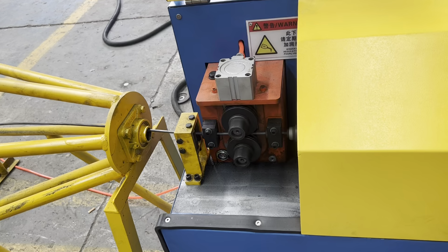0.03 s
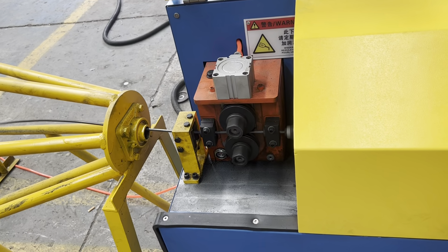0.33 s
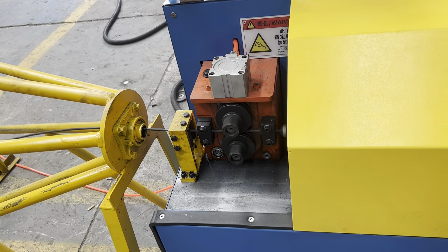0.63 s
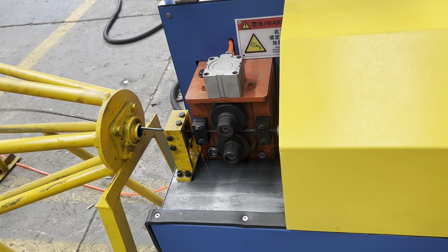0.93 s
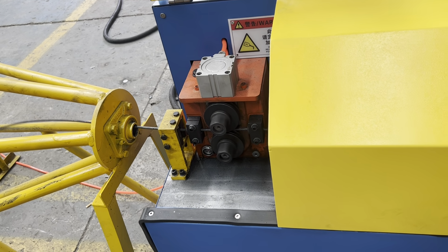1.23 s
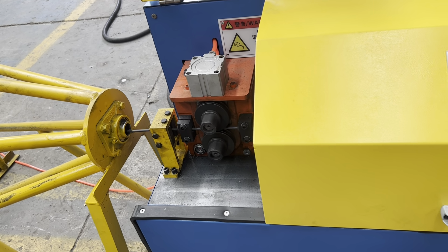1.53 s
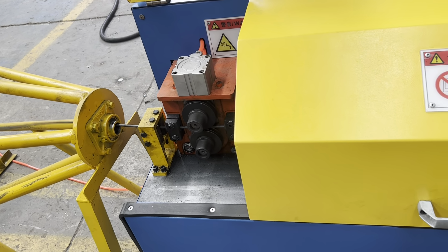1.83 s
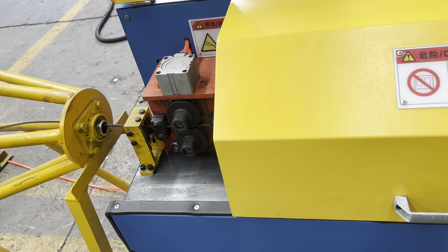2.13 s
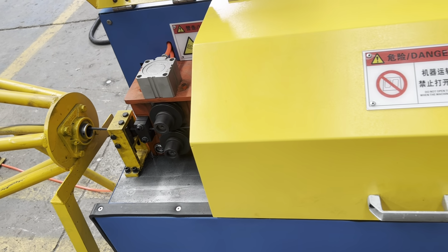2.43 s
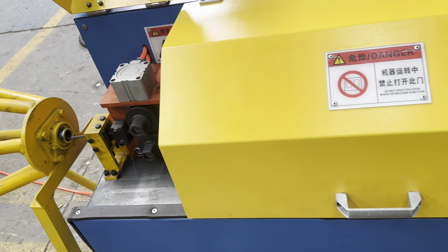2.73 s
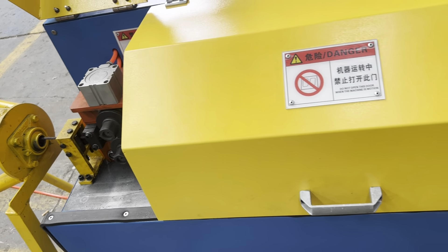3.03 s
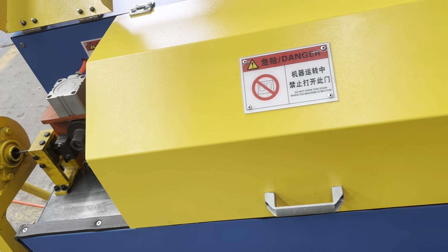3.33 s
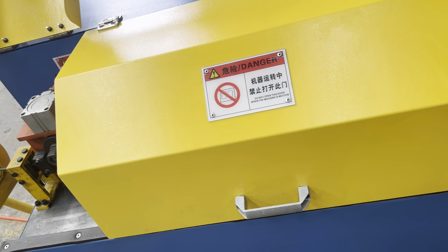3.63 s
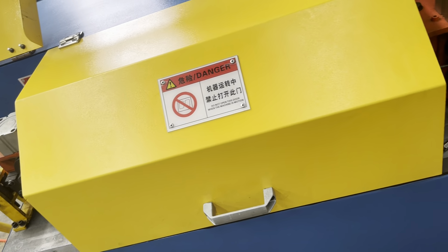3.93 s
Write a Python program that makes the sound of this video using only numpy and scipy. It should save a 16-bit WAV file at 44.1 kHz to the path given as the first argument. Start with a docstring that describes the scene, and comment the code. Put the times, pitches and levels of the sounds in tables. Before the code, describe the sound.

A wire straightening machine drones and rattles close by in an open yard. The wire scrapes and gives thin, high squeaks, with a few ticks and dull knocks, then clanks against its guides near the end.

```python
"""A wire straightening machine runs in an open yard, close to a handheld camera with two microphones.
From the start its rotor hums at about 90 turns a second over the motor, the steel hood rattles, and
the wire scrapes, hisses and squeaks once a turn in the dies (the holes it is pulled through).
Two sharp ticks come in the first second, then two dull knocks and a few thin pings; the feed rollers
rasp now and then. From 3.4 s the wire clanks against its guides."""
import sys
import numpy as np
from scipy import signal
from scipy.fft import rfft, irfft, next_fast_len
from scipy.io import wavfile
from scipy.ndimage import uniform_filter1d, map_coordinates

SR = 44100
rng = np.random.default_rng(int(sys.argv[2]) if len(sys.argv) > 2 else 0)


def to_wav(s):
    """Save 16-bit WAV."""
    ch = np.atleast_2d(s).T  # columns
    pcm = np.round(np.clip(ch, -1, 1) * 32767)  # PCM
    wavfile.write(sys.argv[1], SR, pcm.astype(np.int16))


N = 176400
TIME = np.arange(N) / SR


def hum(angle):
    """The off-balance rotor, the drive and the motor shake as they spin, making wavering tones."""
    # four tones (time [s], rotor [dB], twice rotor [dB], drive [dB], four times motor [dB])
    levels = [(0.08, -25.5, -30, -23, -28), (0.12, -23, -25.5, -22, -40), (0.21, -24.5, -25.5, -23, -24),
              (0.73, -23.5, -24, -21, -43), (0.86, -23, -25.5, -23.5, -29), (1.26, -25.5, -26, -22, -35),
              (1.32, -26, -39, -42, -43), (1.35, -21, -31, -28, -20.5), (1.48, -24, -44, -25, -22.5),
              (1.55, -25, -32, -21.5, -32), (1.79, -25.5, -26, -25.5, -23), (1.85, -28.5, -28, -31.5, -27),
              (2.16, -25.5, -25, -22, -39), (2.23, -25.5, -28.5, -23.5, -24), (2.52, -28, -26.5, -24, -39),
              (2.8, -27, -30.5, -23.5, -28), (2.88, -28, -23, -28.5, -32), (3.1, -26, -38, -30.5, -25.5),
              (3.23, -26, -28, -20.5, -29.5), (3.47, -27, -28, -20, -26), (3.82, -28.5, -27.5, -24.5, -31),
              (3.95, -30, -28.5, -21.5, -30.5)]
    # one value for each tone
    trims = [-0.6, 0.35, -0.027, -1.4]  # (added level [dB])
    wavers = [1.2, 1.4, 1.7, 2.5]  # (level wobble [dB])
    jitters = [.08, .15, .25, .7]  # (phase wobble [radians])
    pans = [0.5, -2, -3, -3]  # (left minus right [dB])
    motor_tones = [(1, -48.5), (2, -37.5)]  # low drone (multiple of motor speed, level [dB])
    drive, motor = 2.9, .557  # turns per rotor turn
    out = sum(amp(db) * np.sqrt(2) * np.sin(k * motor * angle + 0.19 * wobble(4.8))
              for k, db in motor_tones)
    flutter_db = 0.4 * wobble(31.83)
    multiples = [1, 2, drive, 4 * motor]
    for k, db, trim, waver, jitter, pan in zip(multiples, curves(levels), trims, wavers, jitters, pans):
        tone = np.sqrt(2) * np.sin(k * angle + jitter * wobble(16) + 2 * np.pi * rng.random())
        gain = amp(db + trim + flutter_db + waver * wobble(18))
        out = out + tone * gain * amp([[pan / 2], [-pan / 2]])
    return out


def hood():
    """The sheet-steel hood rattles in an even churn."""
    levels = [(.05, -20.5, -21.5), (.6, -21.5, -20.5), (1.0, -20.5, -20.5), (1.25, -20.5, -21),
              (1.65, -21.5, -22.5), (2.1, -25.5, -24.5), (2.5, -24.5, -23.5), (2.9, -23.5, -21.5),
              (3.35, -23, -22), (3.72, -23.5, -23.5), (4, -24.5, -21)]  # rattle (time [s], low part [dB], high part [dB])
    spectrum = [(200, -26), (330, -3), (400, -6.5), (450, -4), (500, -1.5), (590, 1), (670, -5.5),
                (745, -3.5), (810, -2), (900, -7), (980, -10), (1060, -7.5), (1300, -7), (1520, -7.5),
                (1650, -10), (1820, -10.5), (1960, -12), (2100, -15.5), (2300, -18.5), (2900, -19.5),
                (3600, -22.5), (4300, -23), (5400, -29), (9000, -35)]  # its tone colour (frequency [Hz], level [dB])
    low_db, high_db = curves(levels)
    shaking = unit(amp(0.51 * wobble(260) + 0.64 * wobble(45)))
    rattle = shaking * even(patchy(rush(spectrum), depth_db=1.03))
    low = filtered(rattle, lambda hz: 1 / (1 + (hz / 1400) ** 6))  # below 1400 Hz
    return amp(1) * (amp(low_db) * low + amp(high_db) * (rattle - low))


def ringing():
    """Shaken steel parts keep ringing, and come and go as the camera moves along the hood."""
    parts = [(349.5, 12, -39, 2.5), (500.6, 12, -37.5, 0), (738, 19, -35.5, -1.5), (1050, 40, -40.5, -2),
             (1310, 30, -40, -0.5), (1553, 12, -39.5, 1.3), (1950, 68, -40.5, -3.5),
             (2443, 16, -47.5, -0.5), (8030, 44, -48.5, -0.5)]  # (pitch [Hz], width [Hz], level halfway [dB], drift [dB per s])
    out = 0
    for pitch, width, db, drift in parts:
        gain = amp(db + drift * (TIME - N / SR / 2) + 2.2 * wobble(6.77))
        out = out + gain * even(noise(lambda hz: 1 / (1 + ((hz - pitch) / (width / 2)) ** 2)))
    return out


def wire(angle):
    """The wire rubs in the spinning dies: it scrapes, hisses and squeaks once a turn."""
    levels = [(0.06, -39.5, -42), (0.17, -38.5, -55), (0.29, -40, -39), (0.32, -40, -45),
              (0.37, -33.5, -34), (0.51, -34, -47), (0.56, -29, -40), (0.58, -35.5, -43), (0.8, -40, -46.5),
              (0.91, -35, -47), (1.15, -39, -47), (1.27, -30.5, -33.5), (1.51, -37.5, -52),
              (1.56, -34, -40), (1.94, -40, -48.5), (2.8, -38.5, -45), (2.89, -33, -38),
              (2.91, -36.5, -38.5), (3.05, -32.5, -38), (3.17, -39, -46), (3.33, -36.5, -39),
              (3.39, -39, -44.5), (3.55, -33.5, -43), (3.62, -37, -42), (3.75, -37.5, -44.5),
              (4, -35.5, -43)]  # rubbing (time [s], scrape [dB], hiss [dB])
    # tone colours (frequency [Hz], level [dB])
    scrape_spectrum = [(1500, -20), (2500, -2.5), (3600, -2), (3900, -3.5), (4300, -3), (5400, -2.5),
                       (6300, -0.5), (7500, -1), (8000, 0), (8400, -2.5), (9100, 1.5), (10000, -12.5),
                       (12000, -3), (16000, -15)]
    hiss_spectrum = [(5000, -30), (9000, -6), (10400, -7.5), (11700, -1), (12900, -7), (13550, 3),
                     (14500, -1.5), (15700, 1.5), (17000, -19)]
    scrape_db, hiss_db = curves(levels)
    turn = angle + 0.32 * wobble(13)
    grip = wobble(27.95)
    scrape_flicker = unit(amp(0.23 * np.cos(turn) + 1.26 * grip + 1.1 * wobble(700)))
    scrape = scrape_flicker * patchy(rush(scrape_spectrum), depth_db=2.5)
    hiss_flicker = unit(amp(0.63 * np.cos(turn) + 0.56 * grip + 1.4 * wobble(600)))
    hiss = hiss_flicker * patchy(rush(hiss_spectrum), depth_db=3.5)
    return amp(scrape_db + 4.5) * scrape + amp(hiss_db + 9) * hiss + squeaks(turn)


def squeaks(turn):
    """The wire gives one high squeak a turn, louder in short spells."""
    spells = [(0.235, 0.12, -21), (0.4, 0.056, -24), (0.597, 0.031, -22), (0.75, .06, -27),
              (0.926, 0.064, -29), (1.187, .04, -24), (1.282, 0.08, -29), (1.452, .06, -29),
              (1.725, 0.063, -28), (2.062, 0.16, -33), (2.98, .12, -32)]  # (middle [s], length [s], level [dB])
    spectrum = [(9000, -20), (11500, -18), (12400, -12), (13000, -20), (13550, 0), (14300, -14),
                (15700, -13), (17000, -22)]  # tone colour (frequency [Hz], level [dB])
    idle_db, sharpness, scatter_db = -36.5, 3.7, 4
    swell = sum(amp(db) * np.exp(-(2 * (TIME - s) / length) ** 4) for s, length, db in spells)
    pulses = np.exp(sharpness * (np.cos(turn) - 1)) * amp(scatter_db * wobble(90))
    return (amp(idle_db) + swell) * pulses * rush(spectrum)


def clanks():
    """The wire slaps its guide: a crash and short steel notes, whose mix depends on where it hits."""
    # slaps (time [s], level [dB], brightness [dB per octave], place [0 near end to 1 far end])
    slaps = [(3.4222, -13, -.5, 0.097), (3.436, -18, -0.5, 0.12), (3.458, -22.5, 2, 0.31),
             (3.8715, -18, -0.5, 0.37), (3.9, -13, 0.5, 1)]
    # the guide's notes (pitch [Hz], near-end hit [dB], far-end hit [dB], fade time [s])
    notes = [(529, -2.5, -2.5, 0.19), (914, -10, -7, 0.19), (996, -6.5, -2, 0.15), (1450, -16, -6, 0.15),
             (1798, -0.5, -24, 0.094), (1930, -3, 4, 0.11), (2108, -14, -5.5, 0.16),
             (2466, -4.5, -10, 0.14), (2690, -16, -9, 0.038), (2910, -13, -9, 0.14),
             (3340, -10, -11, 0.098), (3656, -7.5, -14, 0.11), (4190, -15, -6, 0.083),
             (5610, -25, -16, .12)]
    spectrum = [(30, -70), (200, -8), (480, 3), (1000, -3), (1900, -3), (2600, -3), (4200, -6.5),
                (6000, -11), (9000, -22), (16000, -35)]  # the crash's tone colour (frequency [Hz], level [dB])
    out = 0
    for s, db, brightness, place in slaps:
        tilt_db = lambda hz: brightness * np.log2((hz + 1) / 2000)
        crash = noise(lambda hz: amp(along(spectrum, hz) + tilt_db(hz)))
        out = out + amp(db - 3.5) * decay(s, fade=0.17, attack=0.00073) * crash
        for hz, near_db, far_db, fade in notes:
            note_db = np.interp(place, [0, 1], [near_db, far_db]) + tilt_db(hz) + rng.normal(0, 1)
            phase = 2 * np.pi * rng.random() + .5 * rng.standard_normal((2, 1))
            note = np.sin(2 * np.pi * hz * TIME + phase)
            out = out + amp(db + note_db - 1.04) * decay(s, fade, attack=0.00091) * note
    return out


def pings():
    """The wire catches briefly and rings with a thin, high note."""
    catches = [(1.6594, 8000, -22), (2.8674, 8000, -17), (3.4226, 7200, -22.5), (3.469, 7900, -20),
               (3.5744, 7160, -33), (3.905, 7170, -29)]  # (time [s], pitch [Hz], level [dB])
    note = lambda hz: np.sin(2 * np.pi * hz * TIME + 0.66 * wobble(220))
    return sum(amp(db) * decay(s, fade=0.09, attack=0.0034) * note(hz) for s, hz, db in catches)


def ticks():
    """The wire catches in the dies with a dry tick."""
    catches = [(.5985, -24), (0.699, -17)]  # (time [s], level [dB])
    spectrum = [(2000, -25), (6000, -5), (12000, -8), (13700, -2), (16000, -3)]  # tone colour (frequency [Hz], level [dB])
    return rush(spectrum) * sum(amp(db) * decay(s, fade=0.041, attack=0.00046) for s, db in catches)


def knocks():
    """The hood gives a soft, dull knock now and then."""
    blows = [(1.165, -16.5), (2.285, -25)]  # (time [s], level [dB])
    spectrum = [(200, -40), (500, 3), (800, -2), (4000, -53)]  # tone colour (frequency [Hz], level [dB])
    return rush(spectrum) * sum(amp(db) * decay(s, fade=0.31, attack=.004) for s, db in blows)


def rasps():
    """The feed rollers slip on the wire: brief bands of noise."""
    slips = [(0.413, 0.1, 4100, -34), (1.564, 0.045, 4300, -33), (1.77, .015, 4300, -31),
             (2.67, 0.085, 4500, -33.5), (3.178, 0.21, 2920, -35.5)]  # (middle [s], length [s], pitch [Hz], level [dB])
    octaves = 0.44  # half the width of a band
    band = lambda pitch: noise(lambda hz: np.exp(-.5 * (np.log2((hz + 1) / pitch) / octaves) ** 2))
    return sum(amp(db) * np.exp(-(2 * (TIME - s) / length) ** 2) * band(hz)
               for s, length, hz, db in slips)


def frame():
    """The machine's frame rumbles underneath."""
    levels = [(.05, -27), (.9, -24), (1.4, -23), (2.1, -28.5), (2.8, -26), (3.4, -26), (4, -26.5)]  # rumble (time [s], level [dB])
    spectrum = [(25, -40), (40, -20), (55, -0.5), (75, 1.5), (100, -10.5), (120, -3), (150, -1),
                (175, -0.5), (222, 7.5), (245, 2.5), (272, 5), (290, -1), (320, -1), (352, 2.5),
                (400, -3.5), (480, -6.5), (700, -56)]  # its tone colour (frequency [Hz], level [dB])
    return amp(curves(levels)[0]) * rush(spectrum)


def amp(db):
    """Decibels to gain."""
    return 10 ** (np.asarray(db) / 20)


def unit(x):
    """Scale to an average power of 1."""
    return x / np.sqrt(np.mean(x ** 2) + 1e-20)


def along(points, hz):
    """Read between (frequency, value) points on a log axis."""
    f, v = np.transpose(points)
    return np.interp(np.log(hz + 1), np.log(f + 1), v)


def curves(rows):
    """One value per sample for each column after the time."""
    s, *cols = np.transpose(rows)
    return [np.interp(TIME, s, c) for c in cols]


def wobble(rate):
    """A smooth curve through `rate` random values a second."""
    return map_coordinates(rng.standard_normal(int(N * rate / SR) + 4), [TIME * rate])


def filtered(x, response):
    """Multiply each frequency in x by response(hz)."""
    m = next_fast_len(N + 8192)
    return irfft(rfft(x, m) * response(np.fft.rfftfreq(m, 1 / SR)), m)[..., :N]


def noise(gain):
    """Noise shaped by gain(hz), partly alike on the left and right."""
    likeness = [(60, 1), (250, 0.89), (450, 0.57), (1000, 0.26), (1900, 0.49), (2300, 0.17), (3200, 0.71),
                (4500, 0.7), (5800, 0.33), (7000, 0.65), (9000, 0.94), (9800, 1), (10700, 1), (11300, 0.56),
                (12500, 1), (13500, 1), (14600, 0.99)]  # (frequency [Hz], left-right likeness [0 to 1])
    spread = lambda hz: np.arccos(np.clip(along(likeness, hz), 0, 1)) / 2
    shares = lambda hz: np.array([np.cos(spread(hz)), np.sin(spread(hz))])
    mid, side = filtered(rng.standard_normal((2, N)), lambda hz: gain(hz) * shares(hz))
    return unit(np.array([mid + side, mid - side]))


def rush(spectrum):
    """Stereo noise with the given tone colour."""
    return noise(lambda hz: amp(along(spectrum, hz)))


def decay(s, fade, attack):
    """A blow at time s rises, and dies away by 60 dB in `fade` seconds."""
    age = np.maximum(TIME - s, 0)
    return np.exp(-np.log(1000) * age / fade) * (1 - np.exp(-age / attack))


def patchy(x, depth_db):
    """Let neighbouring pitch bands swell and fade on their own."""
    bands = signal.stft(x, nperseg=512)[2]
    swell = uniform_filter1d(rng.standard_normal(bands.shape[1:]), size=6, axis=0)
    swell = uniform_filter1d(swell, size=10, axis=1)
    return unit(signal.istft(bands * amp(depth_db * unit(swell)), nperseg=512)[1][:, :N])


def even(x):
    """Hold the power steady from one tenth of a second to the next."""
    power = uniform_filter1d(np.mean(x ** 2, axis=0), size=SR // 10)
    return x / np.sqrt(np.abs(power) + 1e-12)


def scene():
    """The whole machine, spread between left and right."""
    speed = [(0.2, 89.67), (0.42, 89.21), (0.65, 89.84), (1.0, 90.09), (1.25, 90.61), (1.45, 90.98),
             (1.7, 90.23), (1.95, 89.63), (2.3, 89.83), (2.7, 90.22), (3.12, 90.63), (3.4, 89.95),
             (3.75, 89.88)]  # rotor (time [s], speed [turns per s])
    balance = [(60, -1), (130, 0), (290, -1.5), (640, 1), (1410, -2), (3100, 3), (6820, 1), (15000, -1)]  # louder side (frequency [Hz], left minus right [dB])
    # left-right phase (frequency [Hz], left minus right [radians])
    # from 9.7 to 10.7 kHz the sides are set opposite, giving a wide, hollow treble band
    phase = [(50, 0), (600, -0.2), (1550, 0.12), (3010, 1.08), (4910, .5), (5860, -1.5), (6980, 0),
             (8530, -1.4), (9750, -np.pi), (10700, -np.pi), (11300, -4), (12400, -5.3), (13200, -7.4),
             (13700, -5), (15800, -8.6)]
    angle = 2 * np.pi * np.cumsum(curves(speed)[0]) / SR
    sides = np.array([[.5], [-.5]])
    stereo = lambda hz: amp(sides * along(balance, hz)) * np.exp(1j * sides * along(phase, hz))
    tones = hum(angle)
    clatter = hood() + ringing() + frame() + wire(angle) + rasps() + knocks() + clanks() + pings()
    return tones + filtered(clatter + ticks(), stereo)


def record(dry):
    """The camera lets sound in after a moment and cuts the highest treble."""
    start_s, top_hz = 0.0342, 15800
    opened = np.clip((TIME - start_s) / 0.002, 0, 1)
    return filtered(dry * opened, lambda hz: hz < top_hz)


dry = scene()
out = record(dry)
to_wav(out)
```